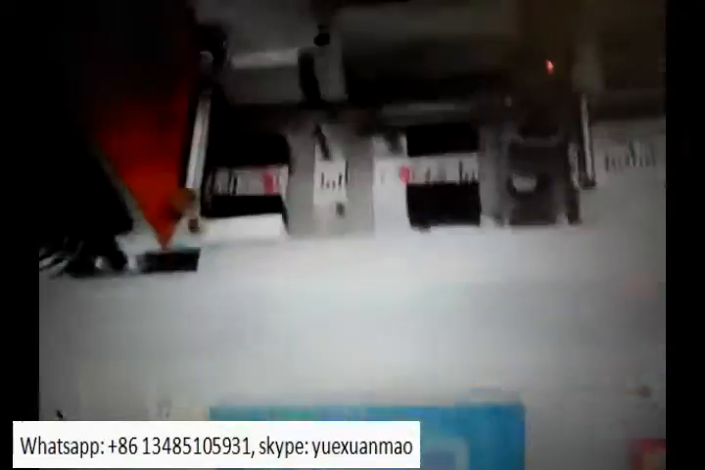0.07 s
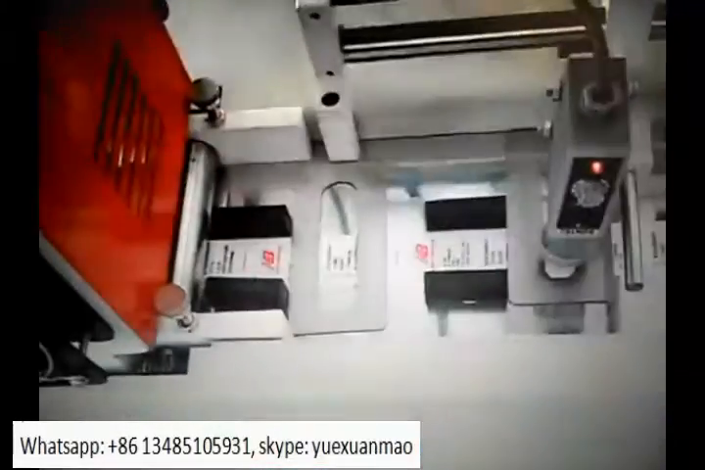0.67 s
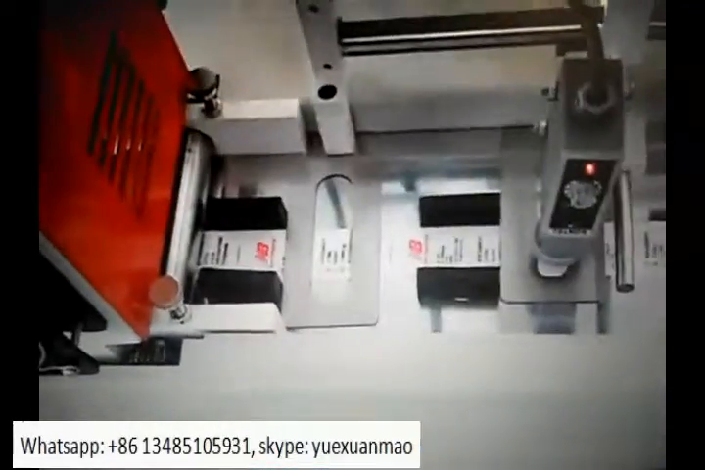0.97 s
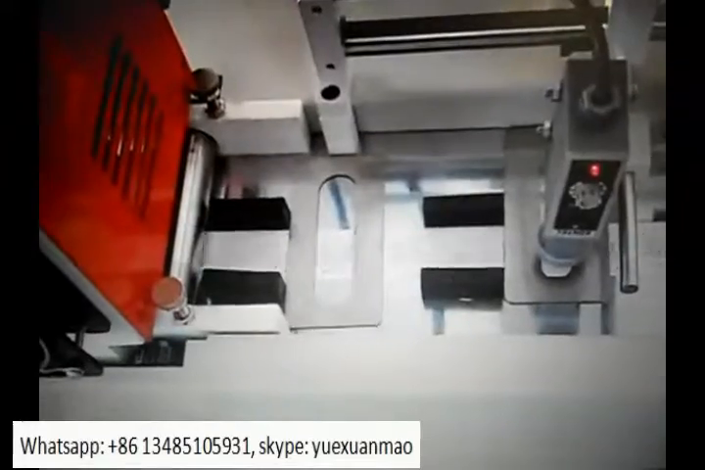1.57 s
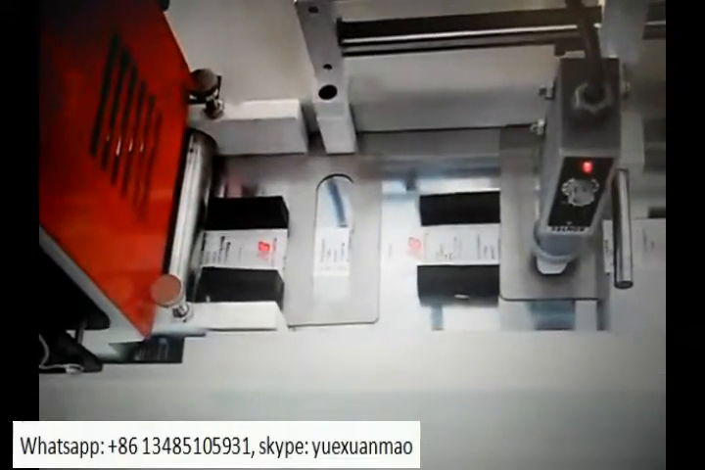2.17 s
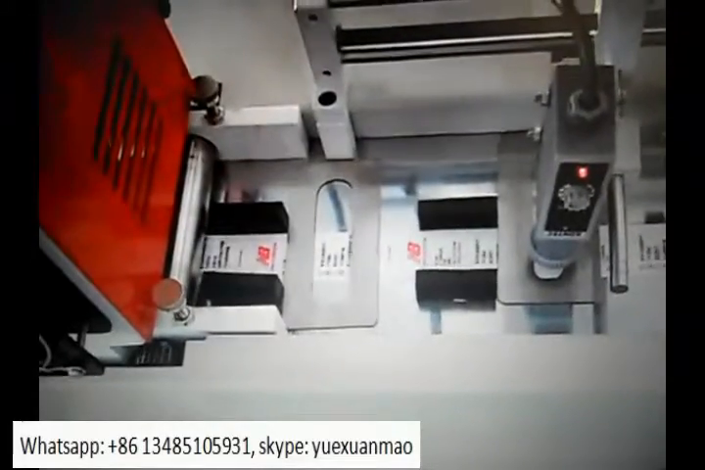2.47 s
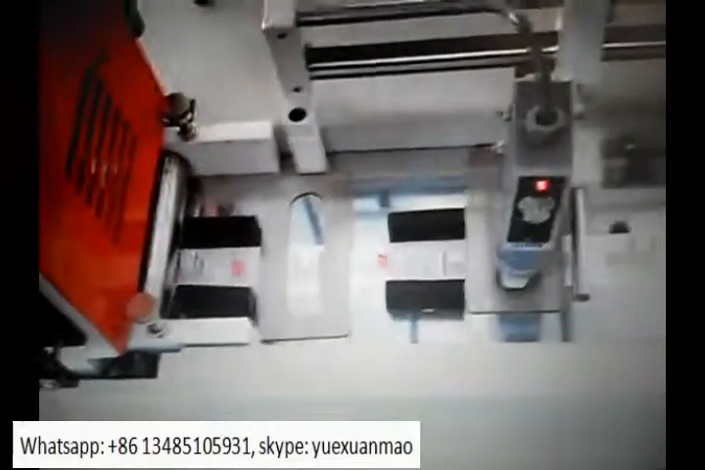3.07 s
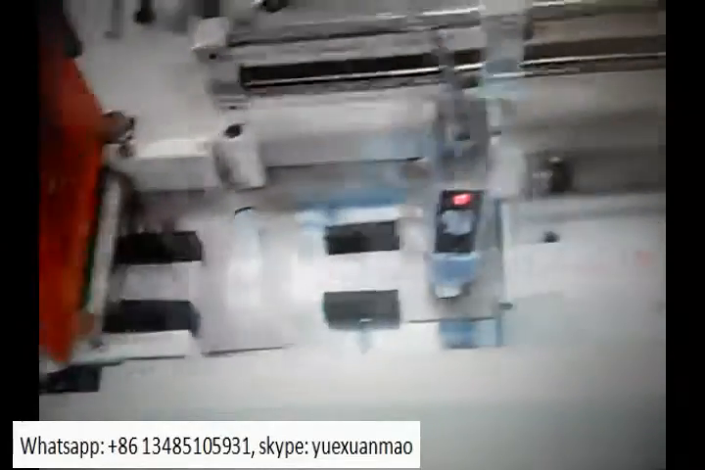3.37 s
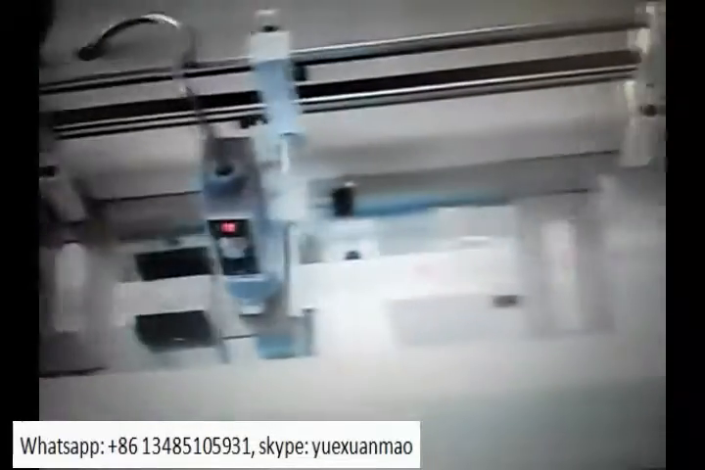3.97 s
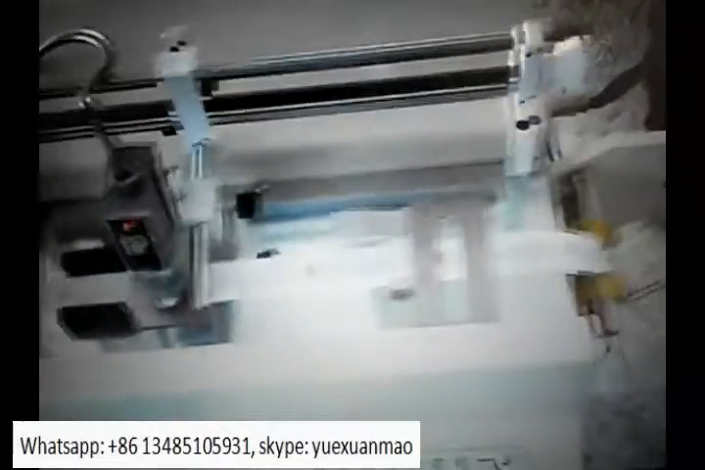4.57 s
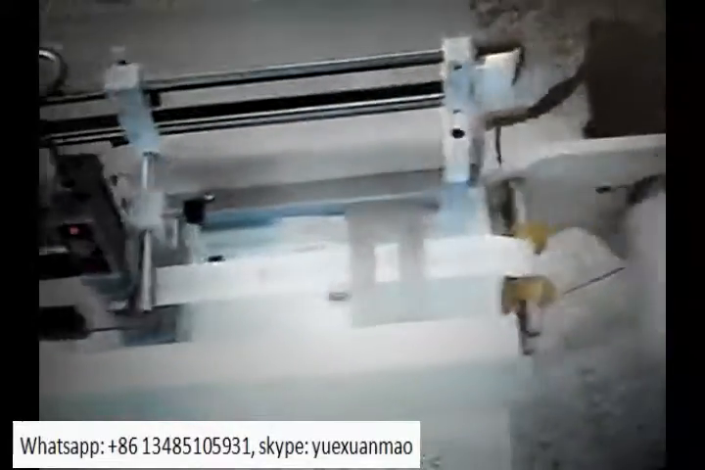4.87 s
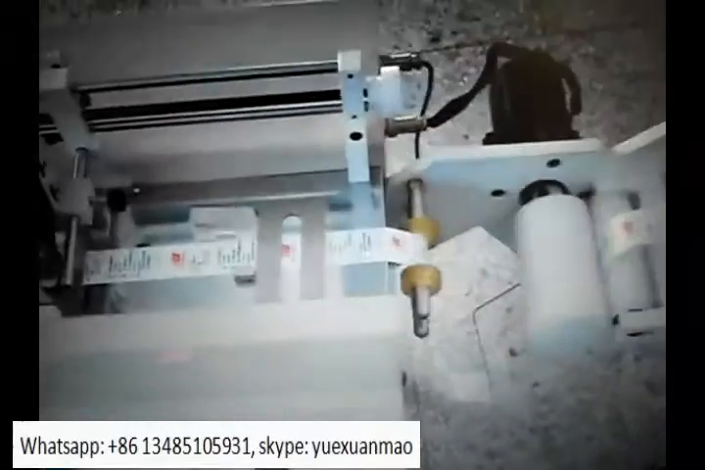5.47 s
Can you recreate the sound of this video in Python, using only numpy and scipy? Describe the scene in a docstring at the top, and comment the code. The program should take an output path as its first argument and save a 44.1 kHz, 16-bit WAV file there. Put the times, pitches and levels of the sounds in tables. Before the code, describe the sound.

A nearby label cutting machine scrapes and squeals over a chattering metal rasp. A knock cuts it off about a second in, and only a soft whirr and low workshop noise remain. A second later the piercing squeal and rasp return and continue, pulsing quickly with each label, along with a thin hiss from the feed and occasional light metallic pings.

```python
"""In a workshop, a nearby ultrasonic label cutter runs, stops with a knock, idles a second and runs again.
Its horn chatters on the anvil about 172 times a second. The impacts force the metal frame into a rasp
and modulate a shrill squeal, which breaks off whenever contact is lost. With each label, about five
a second, the horn grips, the squeal bends, the feed fizzes and the frame jolts. Blows leave the blade
and the ribbon guide ringing; the drive's faint whirr and the room's noise lie behind."""
import sys
import numpy as np
from scipy import signal
from scipy.fft import rfft, irfft
from scipy.io import wavfile
from scipy.ndimage import uniform_filter1d

SR = 44100
rng = np.random.default_rng(int(sys.argv[2]) if len(sys.argv) > 2 else 0)


def digitize_waveform(pressure):
    """Quantize a signal to 16-bit integers and store it at the path in sys.argv[1].

    Rows of a 2-D input are taken as channels; values are limited to [-1, 1].
    """
    field = np.atleast_2d(pressure).T
    bounded = np.clip(field, -1, 1)
    quanta = np.round(bounded * 32767).astype(np.int16)
    wavfile.write(sys.argv[1], SR, quanta)


N = 252252
TIME = np.arange(N) / SR
BINS = np.fft.rfftfreq(N, 1 / SR)


def amp(db):
    """Decibels to amplitude ratio."""
    return 10 ** (np.asarray(db) / 20)

def unit(x):
    """Normalisation to rms 1."""
    return x / np.sqrt(np.mean(x ** 2) + 1e-20)

def follow(rows):
    """Linear interpolation of a table's columns at every sample."""
    times, *columns = np.transpose(rows)
    return [np.interp(TIME, times, column) for column in columns]

def spectrum_at(points, hz):
    """Interpolation on a log-frequency axis."""
    known_hz, value = np.transpose(points)
    return np.interp(np.log(hz + 1), np.log(known_hz + 1), value)

def colour(x, points, peaks=()):
    """Linear filtering: a broad spectrum times single-pole resonances."""
    ringing = 1 + sum((amp(db) - 1) / (1 + 2j * (BINS - hz) / width) for hz, width, db in peaks)
    return irfft(rfft(x) * amp(spectrum_at(points, BINS)) * ringing, N)

def wander(hz):
    """Random fluctuation: noise of rms 1, low-passed at hz."""
    return unit(irfft(rfft(rng.standard_normal(N)) / np.sqrt(1 + (BINS / hz) ** 4), N))

def window(middle_s, length_s):
    """A flat-topped envelope with soft edges."""
    return 1 / (1 + (2 * (TIME - middle_s) / length_s) ** 6)

# workshop noise: frequency_hz, gain_db
SHOP_SPECTRUM = [(20, -8), (80, -10.5), (170, -4), (280, 3.5), (400, -3), (600, -3), (900, -12), (3500, -7),
                 (4500, -15.5), (10000, -19), (11000, -40.5), (14000, -44.5)]
def workshop(level_db=-51):
    """Stationary ambient noise, strongest at low frequencies."""
    return amp(level_db) * unit(colour(rng.standard_normal(N), SHOP_SPECTRUM))

# cutter at work: start_s, stop_s
RUN_TIMES = [(-0.1, 0.8974), (1.887, 5.9)]
def running(rise_s=0.006, decay_s=0.013):
    """Forced vibration builds quickly and decays exponentially at each stop."""
    return sum(np.clip((TIME - start) / rise_s, 0, 1) * np.exp(-np.maximum(TIME - stop, 0) / decay_s)
               for start, stop in RUN_TIMES)

def frame_drone(level_db=-55):
    """Random excitation of the working frame's low modes."""
    spectrum = [(20, -12), (70, -4.5), (160, -3), (280, 17), (450, 5.5), (900, -18)]
    modes = [(210, 4.2, 5.2), (274.7, 6.5, 9.3)]
    return amp(level_db) * unit(colour(rng.standard_normal(N), spectrum, modes)) * running()

# strength of the rasp, one curve a run: time_s, level_db
RASP_LEVELS = [
    [(0.0, -26), (0.18, -25.5), (0.26, -27), (0.45, -28.5), (0.54, -19.5), (0.65, -27.5), (0.73, -19.5),
     (0.89, -20)],
    [(1.9, -19), (2.4, -21.5), (3.0, -24), (3.6, -23), (3.86, -18.5), (4.0, -22), (4.15, -20), (4.45, -25),
     (5.0, -28), (5.4, -23.5), (5.7, -25.5)],
]
# broad response of the frame: frequency_hz, gain_db
RASP_SPECTRUM = [(30, -69.5), (150, -35.5), (450, -28), (750, -25.5), (1000, -15), (1250, 0), (1700, -0.5),
                 (2400, 2), (3200, 3), (4400, -1), (5200, -14.5), (6300, -32), (9500, -29.5), (13000, -55)]
# frame resonances: frequency_hz, width_hz, gain_db
FRAME_MODES = [(523.3, 27, 12), (685, 59, 11.5), (827, 50, 11), (998, 8.9, 12.5), (1358, 5.4, 8)]
def rasp(cycles, lift_db, squeal_db, rebounds_per_s=450, dull_hz=2100, bright_above_db=-19, gain_db=5):
    """Impacts and friction excite the frame's modes; poor contact takes away the treble."""
    strikes = np.diff(np.floor(cycles), prepend=0) * amp(2 * wander(67))
    t = np.arange(round(0.005 * SR)) / SR
    metal_ring = rng.standard_normal(len(t)) * np.exp(-t / 0.00098) * 0.13 + (t == 0)
    strikes = signal.fftconvolve(strikes, metal_ring)[:N]
    rebounds = (rng.random(N) < rebounds_per_s / SR) * rng.choice([-1, 1], N) * rng.uniform(0.8, 1, N)
    friction = rng.standard_normal(N) * (0.5 + np.exp(-(cycles % 1) / 2.7))
    force = 0.46 * unit(strikes) + 0.66 * unit(rebounds) + 0.76 * unit(friction)
    flutter = amp(2.08 * wander(17))
    bright = unit(colour(force * flutter, RASP_SPECTRUM, FRAME_MODES))
    dull = irfft(rfft(bright) / (1 + (BINS / dull_hz) ** 6), N)
    contact = np.clip(amp(0.8 * (squeal_db - bright_above_db)), 0.28, 1)
    level_db = follow(np.vstack(RASP_LEVELS))[0] + lift_db + gain_db
    return amp(level_db) * (dull + contact * (bright - dull))

# strength of the feed's fizz: time_s, level_db
FIZZ_LEVELS = [(0, -41.5), (0.32, -39.5), (0.48, -58), (0.55, -51), (0.9, -52), (1.9, -38), (2.5, -41.5),
               (3.4, -41), (4.4, -40), (5.1, -37.5), (5.7, -42.5)]
# its hiss: frequency_hz, gain_db
FIZZ_SPECTRUM = [(4000, -43.5), (5800, -8), (7300, -10.5), (7750, 1), (8050, -14), (8300, -15),
                 (8700, -8.5), (9100, -11), (11000, -19.5), (14000, -43)]
# its whistling lines: frequency_hz, width_hz, gain_db
FIZZ_MODES = [(7775, 18, 16), (8240, 35, 11), (8260, 33, 29.5), (9070, 25, -7.5), (8611, 11, 22)]
def feed_fizz(cycles, lift_db, gain_db=-1):
    """Noise, amplitude-modulated by the chatter, whistles through narrow resonances."""
    hiss = rng.standard_normal(N) * (1 + 0.5 * np.cos(2 * np.pi * cycles))
    level_db = follow(FIZZ_LEVELS)[0] + lift_db + gain_db
    return amp(level_db) * unit(colour(hiss, FIZZ_SPECTRUM, FIZZ_MODES))

# the shrill squeal heard while the cutter runs, one curve a run: time_s, level_db, pitch_hz, roughness
SQUEAL_CURVES = [
    [(0.452, -33, 3430, 1.04), (0.46, -14.5, 3535, 0.7), (0.53, -12, 3440, 0.9), (0.6, -7.5, 3430, 0.5),
     (0.67, -12, 3535, 0.8), (0.73, -16.5, 3525, 0.76), (0.81, -13, 3294, 0.7), (0.88, -15, 3487, 0.9)],
    [(1.9, -17, 3437, 0.7), (2.15, -13.5, 3440, 0.6), (2.62, -19, 3330, 0.8), (3.1, -17.5, 3420, 0.82),
     (3.48, -19, 3420, 1.08), (3.68, -14, 3440, 1), (3.92, -22.5, 3400, 1.3), (4.27, -11.5, 3345, 0.74),
     (4.41, -22, 3390, 0.97), (4.5, -14, 3360, 0.2), (4.72, -12, 3390, 0.94), (5.08, -9, 3420, 0.61),
     (5.29, -13, 3410, 0.97), (5.45, -9, 3405, 0.76), (5.7, -10, 3410, 0.68)],
]
# separate touches before the horn settles: start_s, length_s, level_db
FIRST_SCRAPES = [(0.044, 0.036, -12), (0.108, 0.003, -23), (0.123, 0.084, -15), (0.213, 0.022, -24),
                 (0.277, 0.011, -18), (0.303, 0.028, -20.5), (0.357, 0.012, -18.5), (0.389, 0.018, -23.5),
                 (0.421, 0.03, -19)]
def squeal_contour(attack_s=0.0024, release_s=0.0072):
    """Intermittent, then sustained excitation: the squeal's level, pitch and roughness."""
    level_db, hz, rough = follow(np.vstack(SQUEAL_CURVES))
    for start, length, db in FIRST_SCRAPES:
        onset = np.clip((TIME - start) / attack_s, 0, 1)
        release = np.clip(1 - (TIME - start - length) / release_s, 0, 1)
        level_db = level_db + onset * release * (db - level_db)
    return level_db, hz, rough

# squeal in unbroken contact: time_s, level_db
FULL_CONTACT = [(0, -10.5), (0.9, -9.5), (1.9, -12), (2.3, -15), (2.6, -15.5), (3.3, -19), (3.7, -10.5),
                (4.3, -13.5), (5.7, -10.5)]
def squeal(cycles, level_db, hz, rough, dive_depth=0.49, gain_db=2):
    """Each bounce modulates a tone's phase; poor contact shortens its duty cycle."""
    duty = np.clip(amp(level_db - follow(FULL_CONTACT)[0]) ** 1.336, 0.08, 1.2)
    from_contact = abs(2 * ((cycles + 0.04 * wander(150)) % 1) - 1)
    gate = np.clip((duty * (1 + 0.256 * wander(120)) - from_contact) / 0.14 + 1.08, 0.026, 1)
    gate = gate / np.sqrt(uniform_filter1d(gate ** 2, size=900))  # equal power at any duty
    bounce = 2 * np.pi * cycles
    dive = -sum(np.sin(k * bounce) / k for k in range(1, 8))  # the pitch dives at each bounce
    bend = dive_depth * dive * (1 + 0.42 * wander(150))
    bend += np.cos(2 * bounce + 0.99 * wander(9.1)) + 0.13 * np.cos(3 * bounce)
    phase = 2 * np.pi * np.cumsum(hz) / SR + np.sqrt(rough) * bend + rough ** 2 * wander(280)
    shimmer = 1 + 0.21 * wander(370)
    return amp(level_db + gain_db) * gate * shimmer * np.sin(phase)

def after_grip(middle_s, length_s, delay_s=0.013, jolt_s=0.024):
    """Envelope of the transient that follows a grip's release."""
    return window(middle_s + length_s / 2 + delay_s, jolt_s)

# the ribbon snags: middle_s, length_s, rasp_lift_db, jolt_db
RIBBON_SNAGS = [(0.127, 0.036, 0, -23.5), (3.353, 0.042, -1.5, -18.5), (4.766, 0.03, 10.5, -36),
                (5.15, 0.042, 3, -21), (5.279, 0.054, -0.5, -24)]
def jolts(hz=1325, spread_hz=110):
    """Transient excitation of one frame resonance at each snag and after each grip."""
    envelope = sum(amp(db) * window(s, length) for s, length, _, db in RIBBON_SNAGS)
    envelope += sum(amp(db) * after_grip(s, length) for s, length, _, _, _, db, _ in LABEL_GRIPS)
    return envelope * (1 + 0.29 * wander(200)) * np.sin(2 * np.pi * hz * TIME + 1.68 * wander(spread_hz))

# blows on the metal: time_s, thud_db, blade_db, guide_db, guide_t60_s
BLOWS = [(0.324, -9.5, -60, -23.5, 0.14), (0.912, 0.5, -41, -70, 0.1), (3.873, -7, -70, -31, 1),
         (5.285, -30, -62, -20, 0.049), (5.481, -32, -63, -27, 0.07)]
# blade modes: frequency_hz, level_db, t60_s
BLADE_MODES = [(9302, -3, 0.42), (9351, 0, 0.42), (12750, -14, 0.35)]
def knocks(thud_hz=1560, width_s=0.0008, rebound_s=0.0062, rebound_db=-11, guide_hz=5350):
    """An impact and one rebound, then damped free vibration of the ribbon guide and blade."""
    out = np.zeros(N)
    for s, thud_db, blade_db, guide_db, guide_t60 in BLOWS:
        t = TIME - s
        impact = np.exp(-(t / width_s) ** 2)
        rebound = amp(rebound_db) * np.exp(-((t - rebound_s) / width_s / 2) ** 2)
        out += amp(thud_db) * (impact + rebound) * np.sin(2 * np.pi * thud_hz * t)
        t = np.maximum(t, 0)
        out += amp(guide_db - 60 * t / guide_t60) * np.sin(2 * np.pi * guide_hz * t)
        for hz, db, t60 in BLADE_MODES:
            out += amp(blade_db + db - 60 * t / t60) * np.sin(2 * np.pi * hz * t)
    return out

def cracks(relative_db=-33, decay_s=0.003, low_hz=4500, high_hz=9500):
    """A brief impact has a broad spectrum: each blow gives a burst of bright noise."""
    envelope = sum(amp(thud_db + relative_db) * (TIME >= s) * np.exp(-abs(TIME - s) / decay_s)
                   for s, thud_db, *_ in BLOWS)
    band = 1 / (1 + (low_hz / (BINS + 1)) ** 4) / (1 + (BINS / high_hz) ** 8)
    return envelope * unit(irfft(rfft(rng.standard_normal(N)) * band, N))

def lapse(middle_s, length_s, catch_s=0.0068):
    """Envelope of one slip: the horn slides off gradually and catches again quickly."""
    slide = np.clip((TIME - middle_s + length_s / 2) / (0.6 * length_s) + 0.5, 0, 1)
    return slide * np.clip((middle_s + length_s / 2 - TIME) / catch_s + 0.5, 0, 1)

# slips out of step with the labels: middle_s, length_s, change_db
STRAY_SLIPS = [(0.825, 0.0064, -14), (0.852, 0.014, -11.5), (2.062, 0.013, -7), (2.366, 0.04, -8),
               (3.772, 0.018, -27), (3.96, 0.05, -9.5), (4.196, 0.025, -9), (4.4, 0.023, -13.5),
               (4.766, 0.031, -14.5), (5.242, 0.012, -9), (5.292, 0.0096, -13.5), (5.488, 0.02, -17.5),
               (5.53, 0.009, -6.5)]
def slips(gap_s=0.021, slip_s=0.026):
    """Loss of contact changes the squeal's level, in dB, at stray moments and around each grip."""
    change_db = sum(db * lapse(s, length) for s, length, db in STRAY_SLIPS)
    for s, length, _, before_db, after_db, _, _ in LABEL_GRIPS:
        reach = length / 2 + gap_s
        change_db += before_db * lapse(s - reach, slip_s) + after_db * lapse(s + reach, slip_s)
    return change_db

# one grip a label, then the feed's return stroke:
# middle_s, length_s, glide_hz_per_s, slip_before_db, slip_after_db, jolt_db, return_rasp_db
LABEL_GRIPS = [(0.485, 0.048, 1005, -3.5, -2.5, -46, -2), (0.675, 0.04, 1509, -7.5, -3, -38, 2),
               (2.273, 0.05, -1500, -5.5, -10, -17.5, 1.5), (2.475, 0.064, -3000, -11, -9.5, -21.5, 0),
               (2.673, 0.059, -7000, -8.5, -10, -20.5, -1), (2.867, 0.063, -2500, -2.5, -0.5, -20, 2),
               (3.076, 0.042, -2500, 2.5, -6.5, -15.5, 0.5), (3.274, 0.032, -2500, -5.5, -16, -20.5, 1.5),
               (3.473, 0.047, -2500, -14, -10.5, -28.5, -1), (3.676, 0.042, -3000, -3.5, -14.5, -32, 4),
               (3.873, 0.027, -2000, -15, 0, -26, 1), (4.07, 0.026, -2000, -25, 3.5, -26, 1.5),
               (4.3, 0.066, -1000, -2, -9, -19.5, -1), (4.51, 0.052, -1000, -4.5, -25, -38, 0)]
def stick_slip(grip_rough=0.65, arch_hz=85, return_delay_s=0.084, return_s=0.041, return_hz_per_s=3000):
    """Stick and slip steer squeal, rasp and fizz: firmer contact means more squeal, less rasp."""
    squeal_db, hz, rough = squeal_contour()
    slip_db, pressure = slips(), wander(14.15)
    hz += 19 * pressure
    squeal_db += 0.94 * pressure + slip_db
    rasp_lift_db = -1.2 * pressure + 0.17 * slip_db
    rasp_lift_db += sum(db * window(s, length) for s, length, db, _ in RIBBON_SNAGS)
    fizz_lift_db = 0.06 * slip_db
    for s, length, glide, _, _, jolt_db, return_rasp_db in LABEL_GRIPS:
        t = TIME - s
        grip, back = window(s, length), window(s + return_delay_s, return_s)
        jolt = amp(jolt_db + 17) * after_grip(s, length)  # 1 for a hard jolt of -17 dB
        # the pitch arches through the grip and climbs on the return stroke
        hz += grip * (glide * t + arch_hz * np.cos(2 * np.pi * t / length))
        hz += back * return_hz_per_s * (t - return_delay_s)
        rough += grip * (grip_rough - rough)
        squeal_db += 2.5 * grip + back
        rasp_lift_db += 2.5 * (jolt - grip) + return_rasp_db * back
        fizz_lift_db += 7 * grip + 1.5 * back
    return squeal_db, hz, rough, rasp_lift_db, fizz_lift_db

# strength of the drive's whirr: time_s, level_db
WHIRR_LEVELS = [(1.1, -46.5), (1.52, -42), (1.79, -40.5), (1.86, -36.5)]
# its noise: frequency_hz, gain_db
WHIRR_SPECTRUM = [(700, -21.5), (1050, -10.5), (1300, 2), (1850, -3), (2000, -3), (2300, -6), (2700, -19.5),
                  (4000, -15.5), (6000, -38)]
# its lines: frequency_hz, width_hz, gain_db
WHIRR_MODES = [(1250, 7.8, 9.8), (1218, 3.7, 6.3), (1606, 2.2, 12), (1790, 23, 2.2), (1738, 14, 12.4),
               (1970, 2, 3.7)]
def drive_whirr():
    """Resonant noise of the drive, masked until the cutter pauses."""
    whirr = unit(colour(rng.standard_normal(N), WHIRR_SPECTRUM, WHIRR_MODES))
    return amp(follow(WHIRR_LEVELS)[0]) * whirr

def saturate(x, ceiling=0.7, low_hz=1000, high_hz=5000):
    """Soft saturation limits the swing, only in the band where the metal rings."""
    envelope = abs(signal.hilbert(x))
    excess = x - x / (1 + (envelope / ceiling) ** 6) ** (1 / 6)
    band = 1 / np.sqrt((1 + (low_hz / (BINS + 1)) ** 8) * (1 + (BINS / high_hz) ** 16))
    return x - irfft(rfft(excess) * band, N)

# reverberation of the workshop: frequency_hz, t60_s
REVERB_TIMES = [(300, 0.92), (1400, 0.38), (3200, 0.55), (8000, 0.38)]
def reverberation(x, onset_s=0.0015):
    """A diffuse field in which each band decays exponentially at its own rate."""
    hz, t, bands = signal.stft(rng.standard_normal(SR), SR, nperseg=256)
    decay = amp(-60 * t / spectrum_at(REVERB_TIMES, hz)[:, None])
    tail = signal.istft(bands * decay, SR, nperseg=256)[1]
    tail *= np.clip(np.arange(len(tail)) / SR / onset_s, 0, 1)
    return signal.fftconvolve(x, tail / np.linalg.norm(tail))[:N]

def scene(chatter_hz=171.9):
    """Superposition of all sources; one chatter rhythm drives squeal, rasp and fizz."""
    cycles = np.cumsum(chatter_hz * (1 + 0.007 * wander(4.53) + 0.02 * wander(60))) / SR
    squeal_db, hz, rough, rasp_lift_db, fizz_lift_db = stick_slip()
    shrill = squeal(cycles, squeal_db, hz, rough) * running()
    frame = (rasp(cycles, rasp_lift_db, squeal_db) + jolts()) * running()
    feed = feed_fizz(cycles, fizz_lift_db) * running()
    blows = knocks() + cracks()
    room = reverberation(amp(-25) * shrill + amp(-14) * (frame + feed) + amp(-12) * blows)
    background = workshop() + drive_whirr() + frame_drone()
    return (saturate(shrill + frame) + feed + blows + room + background)[None]

def record(dry, notch_hz=4010, notch_width_hz=85, notch_db=-15, cutoff_hz=14200):
    """The microphone's response: a narrow notch, clipping at full scale, then a band limit."""
    notch = amp(notch_db * np.exp(-((BINS - notch_hz) / notch_width_hz) ** 2))
    clipped = np.clip(irfft(rfft(dry) * notch, N), -1, 1)
    lowpass = signal.firwin(511, cutoff_hz, window=("kaiser", 9), fs=SR)
    return signal.oaconvolve(clipped, lowpass[None], "same")


dry = scene()
out = record(dry)
digitize_waveform(out)
```